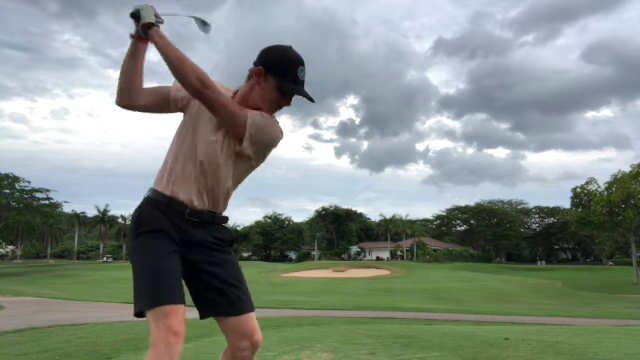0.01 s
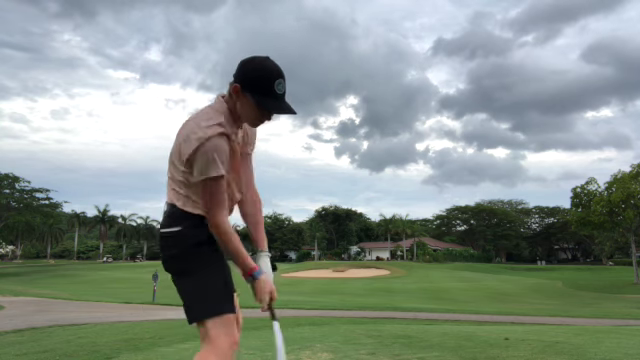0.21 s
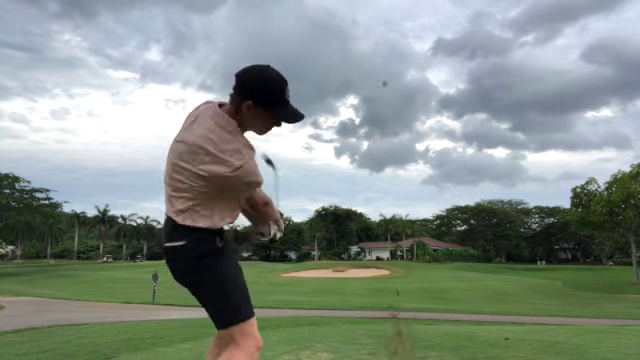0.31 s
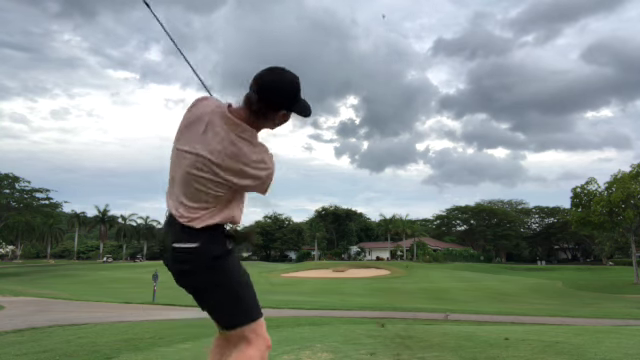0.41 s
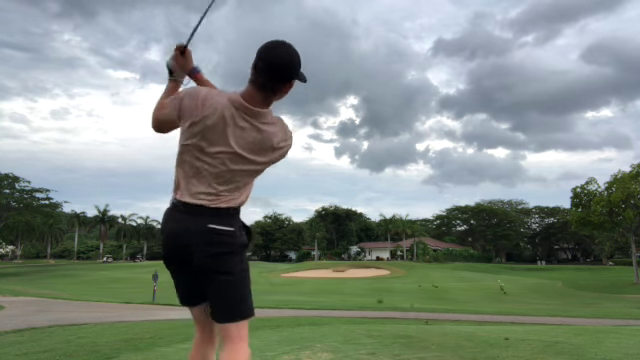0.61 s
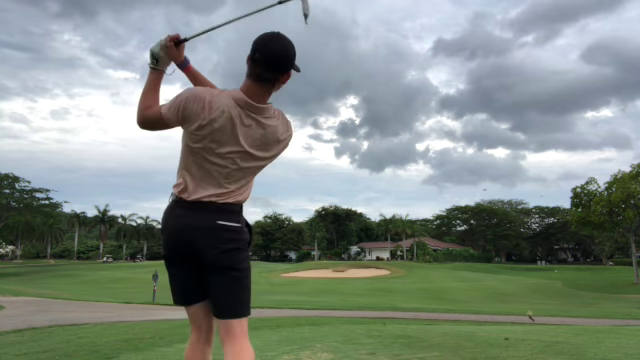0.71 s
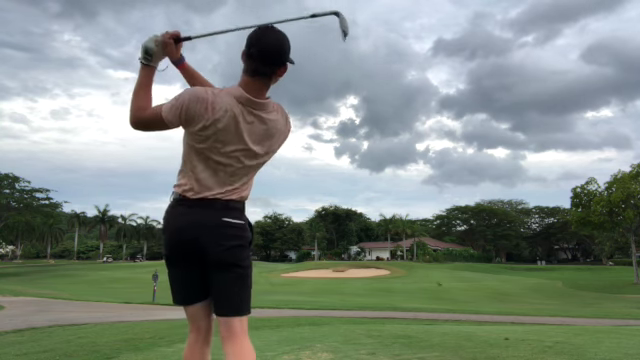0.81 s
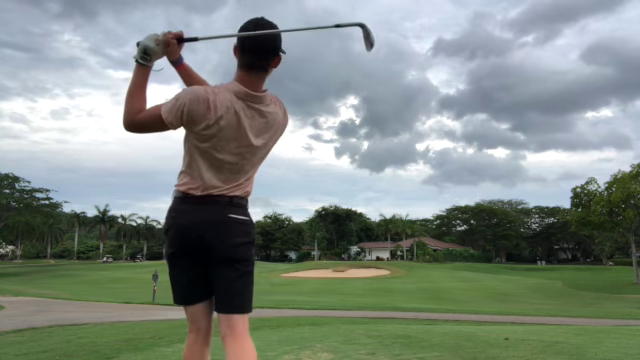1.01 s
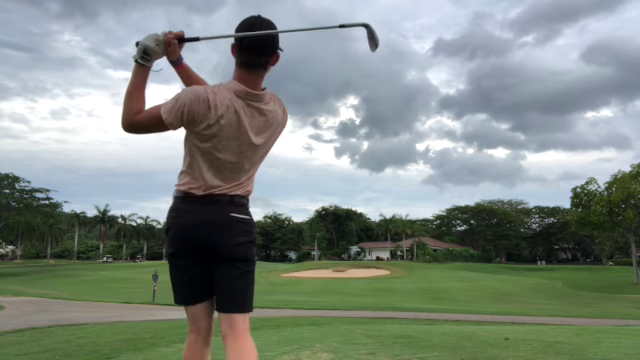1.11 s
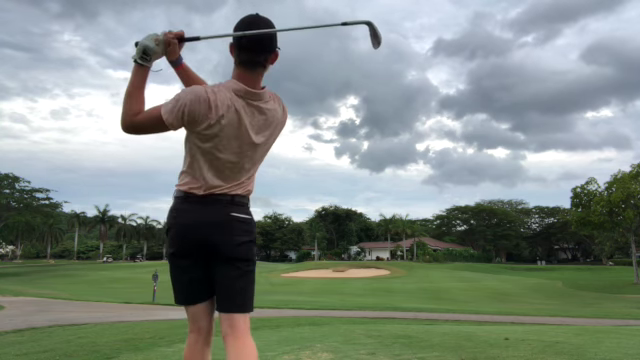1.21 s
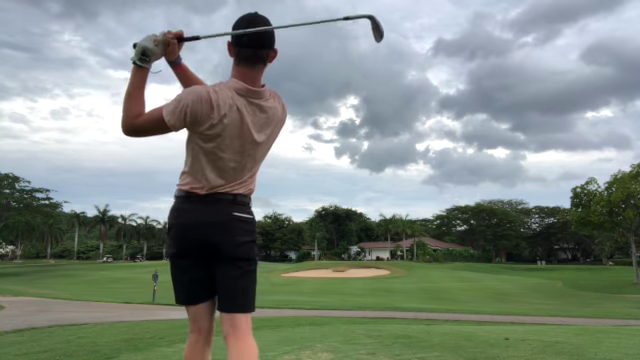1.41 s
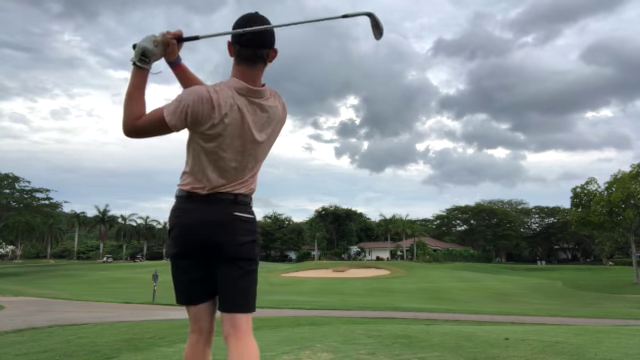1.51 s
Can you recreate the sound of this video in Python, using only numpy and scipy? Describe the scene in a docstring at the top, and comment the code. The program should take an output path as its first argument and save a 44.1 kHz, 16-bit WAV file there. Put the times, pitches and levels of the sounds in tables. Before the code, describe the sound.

An iron golf club swooshes and sharply cracks against a ball, with faint birds afterward.

```python
"""An iron shot off the grass

Vortex shedding makes the shaft whistle, higher as it speeds up. The impact of face on ball excites
a crack and briefly ringing modes; the blade cuts the turf, thuds in the ground and sprays soil.
Clothes rustle by friction in the follow-through. Faint birds call over the low rumble of the open
course, and ground and trees scatter a soft echo of the shot and the birds."""
import sys
import numpy as np
from scipy import signal
from scipy.fft import rfft, irfft
from scipy.io import wavfile

SR = 44100
rng = np.random.default_rng(int(sys.argv[2]) if len(sys.argv) > 2 else 0)


def store_pcm(level_fs):
    """Save levels as 16-bit WAV."""
    pcm = np.round(np.clip(level_fs, -1, 1) * 32767).astype(np.int16)
    wavfile.write(sys.argv[1], SR, np.atleast_2d(pcm).T)


N = 70560
TIME = np.arange(N) / SR
FREQ = np.maximum(np.fft.rfftfreq(N, 1 / SR), 1)
CONTACT_S = 0.00046  # rise time of a sharp contact


def undb(db):
    """Amplitude ratio of a level in decibels."""
    return 10 ** (np.asarray(db) / 20)


def unit(x):
    """Normalisation to rms 1."""
    return x / np.sqrt(np.mean(x ** 2))


def shaped(gain):
    """Spectral shaping: white noise weighted by a gain per frequency, at rms 1."""
    return unit(irfft(rfft(rng.standard_normal(N)) * gain, N))


def noise(spectrum):
    """Broadband noise through (frequency, relative level) points, cut steeply below the first."""
    hz, db = np.array(spectrum).T
    low_cut = np.minimum(FREQ / hz[0], 1) ** 10
    return shaped(undb(np.interp(np.log(FREQ), np.log(hz), db)) * low_cut)


def band(hz, width_hz):
    """Band-pass noise with steep sides."""
    detuning = (FREQ - hz ** 2 / FREQ) / width_hz
    return shaped(1 / np.sqrt(1 + detuning ** 6))


def walk(rate_hz):
    """Low-pass noise: a smooth random fluctuation."""
    return shaped(np.exp(-(FREQ / rate_hz) ** 2))


def grains(rate_hz, spread_db):
    """Log-normal amplitude modulation, heard as a grainy texture."""
    return unit(undb(spread_db * walk(rate_hz)))


def burst(start, attack, t60, hold=0):
    """Transient envelope: quadratic attack, hold and exponential decay, all in seconds."""
    t = TIME - start
    decay = np.exp(-np.log(1000) * np.maximum(t - attack - hold, 0) / t60)
    return np.clip(t / attack, 0, 1) ** 2 * decay


def swell(peak, rise, fall):
    """Gaussian envelope; rise and fall are standard deviations in seconds."""
    t = TIME - peak
    return np.exp(-0.5 * (t / np.where(t < 0, rise, fall)) ** 2)


def ring(start, modes):
    """Impulse response: a sum of damped modes of alternating sign."""
    t = np.maximum(TIME - start, 0)
    return sum((-1) ** k * undb(db) * np.sin(2 * np.pi * hz * t) * np.exp(-np.log(1000) * t / t60)
               for k, (hz, db, t60) in enumerate(modes))


# modes of ball and club head (frequency [Hz], level [dB], decay time T60 [s])
IMPACT_MODES = [(643.5, -26, 0.038), (846, -28.5, 0.048), (1168, -23.5, 0.033), (1450, -20, 0.013),
                (1844, -10.5, 0.0098), (2514, -11.5, 0.0084), (2880, -14, 0.0094), (3670, -13, 0.011),
                (5940, -22.5, 0.018), (7060, -27, 0.0067), (10160, -31, 0.02), (11170, -47, 0.013),
                (14100, -19.5, 0.0045)]
def strike(start=0.2572):
    """Impact excitation: the brief contact of face and ball gives a crack and a short modal ring."""
    onset = np.clip((TIME - start) / CONTACT_S, 0, 1)
    crack = undb(-21) * band(7610, width_hz=15220) * burst(start - CONTACT_S, CONTACT_S, t60=0.0037)
    return onset * ring(start, IMPACT_MODES) + crack


# whistle of the shaft (time [s], frequency [Hz], level [dB])
SHAFT_TONE = [(0.171, 200.4, -62.5), (0.185, 272, -57), (.196, 367, -47), (0.203, 427, -50.5),
              (0.215, 464, -37.5), (0.218, 474, -45.5), (.225, 521, -28), (0.232, 524, -57.5),
              (0.246, 526, -30), (0.248, 528, -47.5), (0.257, 573, -34.5), (0.273, 430, -38.5),
              (0.278, 400, -72.5), (.32, 353, -75.5)]
# spectrum of air torn by the club head (frequency [Hz], relative level [dB])
AIR_SPECTRUM = [(150, -26.5), (400, 4.5), (750, -2.5), (1000, -2), (1400, -2.5), (2600, -8.5),
                (4500, -15.5), (7500, -20), (10000, -26.5), (16000, -29.5)]
def swoosh(roughness=0.47, width_hz=112):
    """Aeolian tone: the shaft sheds vortices at a rate that follows its speed; the head adds a rush."""
    times, hz, db = np.array(SHAFT_TONE).T
    phase = 2 * np.pi * np.cumsum(np.interp(TIME, times, hz)) / SR
    sidebands = walk(width_hz) * np.sin(phase) + walk(width_hz) * np.cos(phase)
    envelope = undb(np.interp(TIME, times, db, left=-np.inf, right=-np.inf))
    whistle = unit(np.sin(phase) + roughness * sidebands) * envelope
    rush = undb(-43) * noise(AIR_SPECTRUM) * grains(rate_hz=160, spread_db=2)
    return whistle + rush * swell(0.2435, rise=0.029, fall=0.02)


# spectrum of the blade cutting turf (frequency [Hz], relative level [dB])
TURF_SPECTRUM = [(120, 3.5), (320, -6), (680, 4.5), (1000, -10.5), (1300, 3.5), (2500, -10), (5100, -11),
                 (6000, -4.5), (8500, -14.5), (12000, -20), (16000, -24)]
# blows of the club and the front foot on the ground (time [s], gain [dB])
GROUND_BLOWS = [(0.2642, 0.5), (0.282, -16.5)]
# modes of a thud (frequency [Hz], level [dB], decay time T60 [s])
GROUND_MODES = [(74, -42.5, 0.1), (107.8, -40.5, 0.13), (200.7, -29.5, 0.038), (430, -30.5, 0.021)]
def divot():
    """Fracture and impact: tearing grass gives a noise burst, and blows excite low, damped modes."""
    cut = undb(-25) * noise(TURF_SPECTRUM) * burst(0.2535, attack=0.0039, hold=0.007, t60=0.016)
    return cut + sum(undb(db) * ring(start, GROUND_MODES) for start, db in GROUND_BLOWS)


# spectrum of flying soil and grass (frequency [Hz], relative level [dB])
SPRAY_SPECTRUM = [(100, 0.5), (330, 4), (600, -6), (1500, -11.5), (2700, -10.5), (5000, -13), (7500, -16.5),
                  (11000, -21), (16000, -22)]
# spectrum of torn grass drifting down (frequency [Hz], relative level [dB])
GRASS_SPECTRUM = [(400, 16.5), (1200, 11), (3000, -1.5), (4500, 7), (7000, -4), (10000, -10), (16000, -22)]
def debris(start=0.2513):
    """Granular noise: the many tiny contacts of soil, grass and crumbs merge into hiss and patter."""
    spray = undb(-52) * noise(SPRAY_SPECTRUM) * grains(rate_hz=310, spread_db=1.5)
    spray *= burst(start, attack=0.023, hold=0.018, t60=0.19)
    grass = undb(-64) * noise(GRASS_SPECTRUM) * burst(start, attack=0.04, t60=1)
    crumbs = undb(-70.5) * band(6600, width_hz=2700) * grains(rate_hz=500, spread_db=5)
    crumbs *= swell(0.366, rise=0.016, fall=0.016)
    return spray + grass + crumbs


# spectrum of the rustling shirt (frequency [Hz], relative level [dB])
SHIRT_SPECTRUM = [(150, -3), (400, -1), (700, -0.5), (1000, 4), (1600, -4.5), (3000, -11), (4500, -18),
                  (8000, -24), (12000, -29), (16000, -38)]
# folds snapping taut (time [s], level [dB])
FOLD_SNAPS = [(0.5497, -57.5), (0.5594, -56), (0.5793, -50.5), (0.5884, -54)]
def clothes():
    """Friction noise: fabric rubs as the body turns, and folds snap under sudden tension."""
    shirt = undb(-55.5) * noise(SHIRT_SPECTRUM) * grains(rate_hz=320, spread_db=3)
    shirt *= swell(0.5887, rise=0.039, fall=0.02)
    swish = undb(-78) * band(9000, width_hz=18000) * swell(0.53, rise=0.69, fall=0.25)
    sleeves = undb(-75.5) * band(11900, width_hz=5950) * swell(0.55, rise=0.026, fall=0.026)
    fold_envelope = sum(undb(db) * burst(start, CONTACT_S, t60=0.011) for start, db in FOLD_SNAPS)
    return shirt + swish + sleeves + band(2160, width_hz=2360) * fold_envelope


# small contacts (time [s], knock level [dB], frequency [Hz], decay time T60 [s], snap level [dB])
SMALL_CONTACTS = [(0.4325, -46.5, 2220, 0.006, -72), (.481, -65, 2970, 0.0023, -56.5),
                  (0.61, -39, 1430, 0.0033, -66), (0.677, -41.5, 5470, 0.00061, -71),
                  (0.725, -44, 1950, 0.0035, -58.5)]
def ticks():
    """Light impacts of shoes, grip and falling soil: each is one damped mode and a broadband snap."""
    out, white = np.zeros(N), rng.standard_normal(N)
    for start, knock_db, hz, t60, snap_db in SMALL_CONTACTS:
        out += ring(start, [(hz, knock_db, t60)])
        out += undb(snap_db) * white * burst(start, CONTACT_S, t60=0.0027)
    return out


def note(start, length, pitches, waver):
    """Frequency glide on a parabola through three pitches: sample indices, progress 0-1 and phase."""
    at = np.arange(int(start * SR), min(int((start + length) * SR), N))
    progress = (at / SR - start) / length
    hz = np.polyval(np.polyfit([0, 0.5, 1], pitches, 2), progress) * waver[at]
    return at, progress, 2 * np.pi * np.cumsum(hz) / SR


# whistled notes (time [s], duration [s], start [Hz], middle [Hz], end [Hz], level [dB])
WHISTLED_NOTES = [(0.084, 0.075, 2064, 2430, 2690, -67.5), (0.297, 0.17, 2640, 2592, 2670, -72.5),
                  (0.425, 0.026, 2726, 2650, 2713, -60.5), (0.535, 0.02, 2620, 2630, 2780, -61.5),
                  (0.906, 0.047, 2937, 3035, 2697, -65.5), (.932, 0.054, 4150, 3640, 3470, -64.5),
                  (0.936, 0.072, 3000, 2870, 2820, -67.5), (0.973, 0.032, 1846, 1916, 1900, -66.5),
                  (1.097, 0.025, 3020, 3290, 3530, -68.5), (1.105, 0.022, 2350, 1926, 1940, -61.5),
                  (1.157, 0.039, 2770, 2840, 2620, -61), (1.188, 0.047, 1687, 1410, 1530, -65),
                  (1.213, 0.043, 2880, 3070, 3090, -70), (1.349, 0.06, 3250, 2880, 2600, -65.5),
                  (1.367, 0.05, 2154, 2200, 2400, -62), (1.511, 0.031, 2244, 2237, 2200, -68)]
def bird_whistles(waver, rasp, roughness=0.36):
    """Noise modulation: random sidebands make each thin, gliding tone a little hoarse."""
    out = np.zeros(N)
    for start, length, *pitches, db in WHISTLED_NOTES:
        at, progress, phase = note(start, length, pitches, waver)
        tone = np.imag((1 - roughness + roughness * rasp[at]) * np.exp(1j * phase))
        out[at] += undb(db) * np.sin(np.pi * progress) * tone
    return out


# nasal notes (time [s], duration [s], start [Hz], middle [Hz], end [Hz], level [dB], roughness [0-1])
NASAL_NOTES = [(0.775, 0.054, 1482, 1492, 1500, -59.5, 0.2), (0.824, .012, 1980, 2000, 2000, -59, .2),
               (1.543, 0.059, 1560, 1697, 1634, -56.5, 0.63)]
# response of the bird's throat (frequency [Hz], gain [dB])
THROAT_RESPONSE = [(1500, -13.5), (2000, -27), (3000, 0.5), (3500, -4), (4500, -9), (6000, -11),
                   (6700, -27.5)]
def bird_calls(waver, rasp, brightening=0.45):
    """Source and filter: the throat weights four harmonics; the upper ones enter as the bird pushes."""
    out, flutter = np.zeros(N), 0.37 * walk(rate_hz=220)
    throat_hz, throat_db = np.array(THROAT_RESPONSE).T
    for start, length, *pitches, db, roughness in NASAL_NOTES:
        at, progress, phase = note(start, length, pitches, waver)
        effort = np.interp(progress, [0, 0.83, 1], [0, 1, 0])  # swells, then breaks off
        phase += roughness * flutter[at]
        voice = 0
        for k in range(1, 5):
            throat_gain = undb(np.interp(k * pitches[1], throat_hz, throat_db))
            voice += throat_gain * effort ** (brightening * k) * np.exp(1j * k * phase)
        out[at] += undb(db) * np.imag((1 + roughness * rasp[at]) * voice)
    return out


# rasps of farther birds (peak time [s], standard deviation [s], level [dB])
FAR_RASPS = [(0.947, 0.034, -73.5), (1.121, 0.012, -69.5), (1.193, 0.022, -80.5), (1.39, 0.016, -76)]
def bird_chatter():
    """Amplitude-modulated noise: farther birds blur into short, hoarse rasps."""
    envelope = sum(undb(db) * swell(peak, spread, spread) for peak, spread, db in FAR_RASPS)
    return envelope * band(3410, width_hz=3400) * grains(rate_hz=210, spread_db=3.5)


def birds(rasp_hz=220):
    """Jitter and shimmer: whistles and calls fluctuate in pitch and amplitude over the far chatter."""
    waver = 1 + 0.012 * walk(rasp_hz)
    rasp = walk(rasp_hz) + 1j * walk(rasp_hz)
    return bird_whistles(waver, rasp) + bird_calls(waver, rasp) + bird_chatter()


def echo(x):
    """Diffuse scattering from ground and trees: convolution with a decaying noise of unit energy."""
    tail = band(1800, width_hz=5400) * burst(0, attack=0.005, t60=1)
    return signal.fftconvolve(x, tail / np.sqrt(np.sum(tail ** 2)))[:N]


# spectrum of the open air (frequency [Hz], relative level [dB])
AMBIENT_SPECTRUM = [(42, -2), (52, 1), (70, -6), (120, -4), (145, -12), (175, -9.5), (210, -12.5),
                    (300, -15.5), (450, -20), (750, -24), (1400, -22), (2300, -26), (3200, -27.5),
                    (4500, -33.5), (6500, -39.5), (10000, -41), (12000, -48), (16000, -47)]
def course():
    """Stationary noise: a low outdoor hush, a thin band of insects and the drone of a far engine."""
    hush = undb(-62) * noise(AMBIENT_SPECTRUM)
    insects = undb(-84.5) * band(8600, width_hz=2600)
    engine = undb(-67.5) * band(92.1, width_hz=14)
    return hush + insects + engine


def scene():
    """Superposition: direct sound, echo and background add in one channel."""
    shot = strike() + swoosh() + divot() + debris()
    song = birds()
    scattered = echo(undb(-39.5) * shot + undb(-14) * song)
    return (shot + clothes() + ticks() + song + scattered + course())[None]


def record(dry, low_hz=29, top_hz=15900):
    """Band limiting: a gentle high-pass thins the deepest bass and a steep low-pass cuts the top."""
    high_pass = signal.butter(2, low_hz, "high", fs=SR, output="sos")
    low_pass = signal.ellip(10, 0.2, 80, top_hz, fs=SR, output="sos")
    return signal.sosfilt(low_pass, signal.sosfilt(high_pass, dry))


dry = scene()
out = record(dry)
store_pcm(out)
```